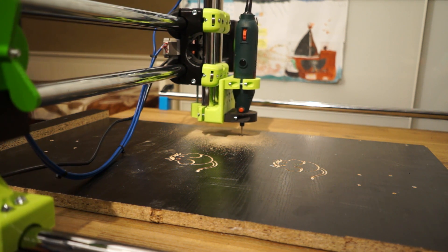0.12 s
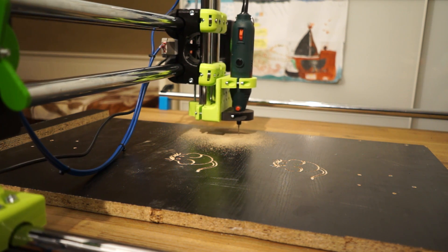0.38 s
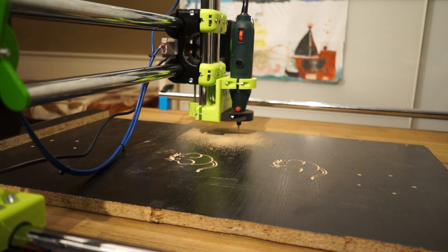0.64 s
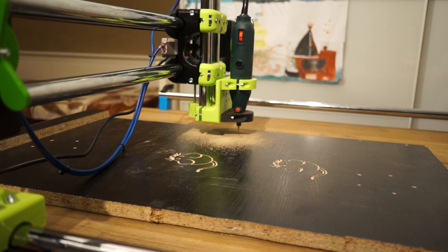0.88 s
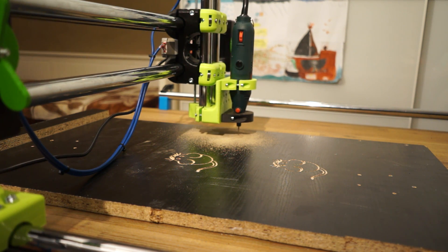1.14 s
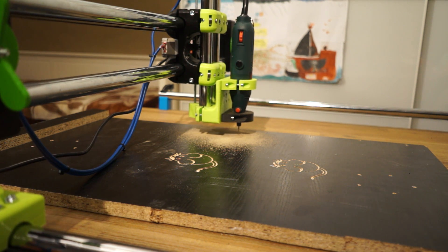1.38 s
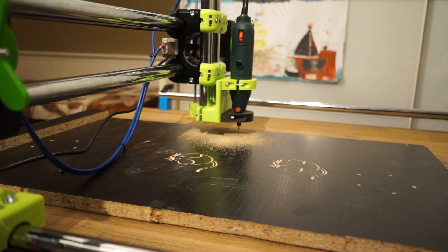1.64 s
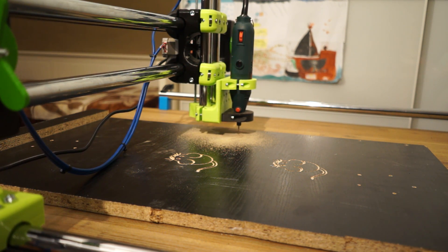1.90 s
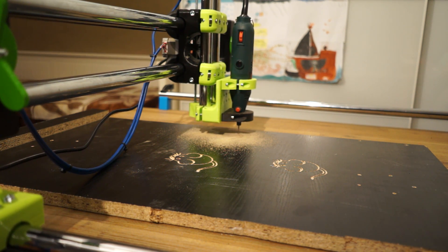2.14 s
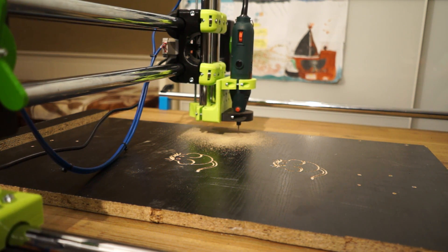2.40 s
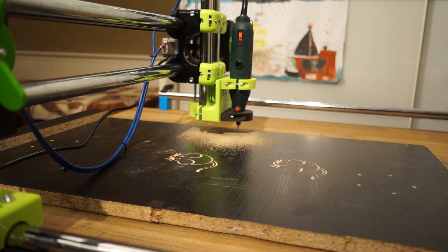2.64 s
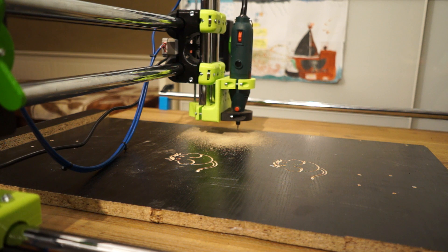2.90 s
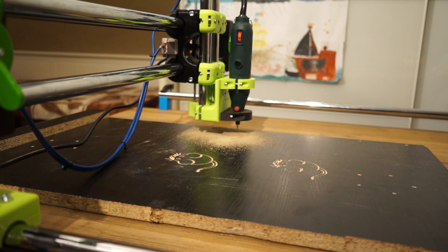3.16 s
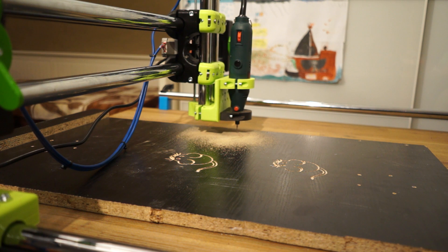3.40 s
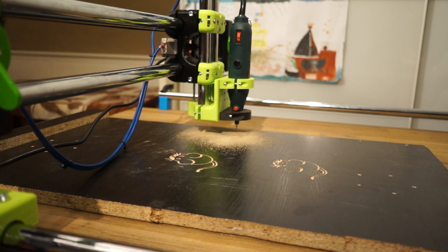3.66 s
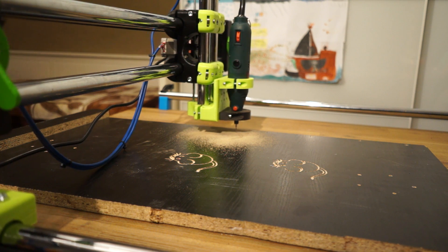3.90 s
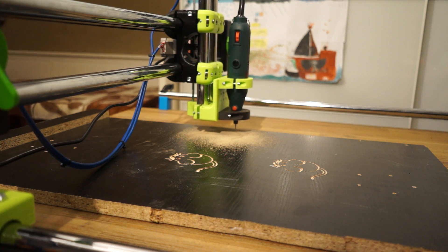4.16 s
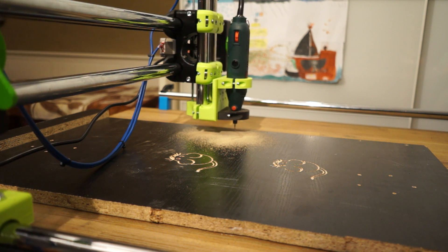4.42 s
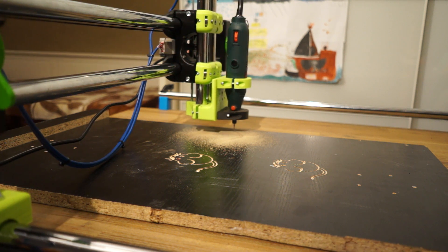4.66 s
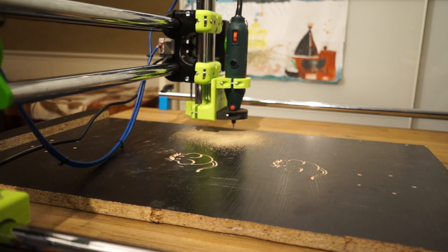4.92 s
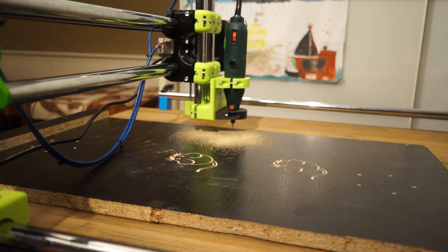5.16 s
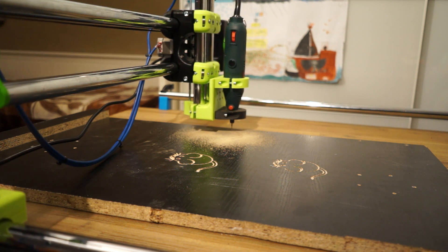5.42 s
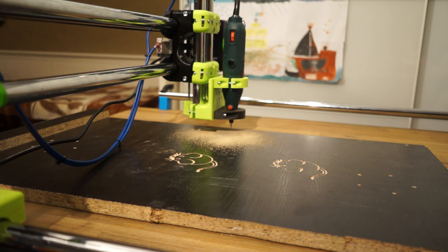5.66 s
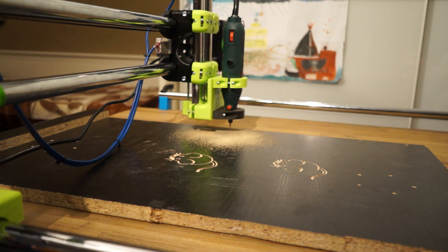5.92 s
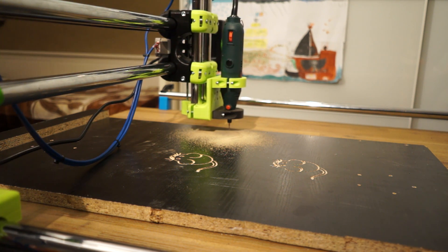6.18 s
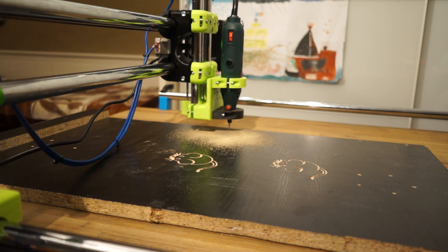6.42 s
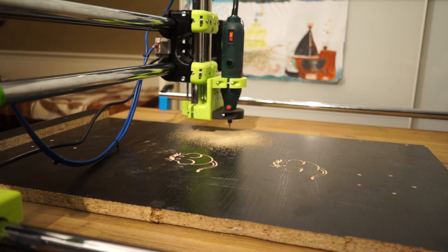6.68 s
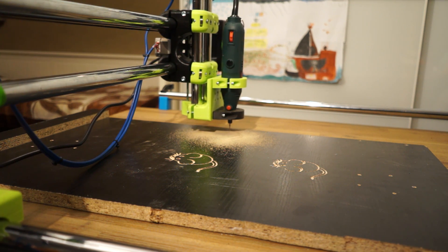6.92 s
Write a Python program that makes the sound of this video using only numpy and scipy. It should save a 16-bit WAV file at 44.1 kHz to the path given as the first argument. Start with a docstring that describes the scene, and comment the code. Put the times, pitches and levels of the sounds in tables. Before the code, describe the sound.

Steady piercing motor whine around 490 turns a second, free at first, then cutting board with brighter ringing, hiss and late rough chatter.

```python
"""Rotary tool cutting wood

A small high-speed rotary tool on a gantry spins free, plunges its bit into a wood board, cuts, and at last chatters.
The shaft sings in sine tones at multiples of its speed, with fainter bearing and chatter tones in between.
Fan, brush and chip hiss is noise that swells with the turning shaft and rings in the housing.
Stepper motors hum in low tones while an axis moves, and mains ripple makes the lowest tones pulse."""
import sys
import numpy as np
from scipy import signal
from scipy.fft import rfft, irfft, next_fast_len
from scipy.io import wavfile
from scipy.ndimage import uniform_filter1d, map_coordinates

SR = 44100
rng = np.random.default_rng(int(sys.argv[2]) if len(sys.argv) > 2 else 0)


def voltage_ratio(decibels):
    """Convert decibels (scalar or array-like) to amplitude ratios, 20 dB per decade."""
    exponent = np.asarray(decibels, float) / 20
    return 10 ** exponent


def dump_mix(stems):
    """Bounce the given channels to the path in sys.argv[1] as a 16-bit WAV at rate SR."""
    frames = np.atleast_2d(stems).T  # one column per channel
    limited = np.clip(frames, -1, 1)  # hard clip at full scale
    pcm = np.round(limited * 32767).astype(np.int16)
    wavfile.write(sys.argv[1], SR, pcm)


N = 310905

# how the cut goes on: (time [s], stage [0 free, 1 shallow, 2 medium, 3 deep, 4 chatter])
CUT_STAGE = [(0, 0), (.975, 0), (.995, 1), (2, 1), (3.7, 2), (5.4, 3), (6.27, 3), (6.32, 4), (7.05, 4)]


def unit(x):
    """Scales a signal to rms 1."""
    return x / np.sqrt(np.mean(np.abs(x) ** 2) + 1e-20)


def curves(rows):
    """Draws straight lines between the rows: one value per sample for each column after the time."""
    times, *columns = np.transpose(rows)
    return [np.interp(np.arange(N) / SR, times, column) for column in columns]


def wobble(rate):
    """A random curve of straight pieces that turns at most rate times a second."""
    knots = rng.standard_normal(int(N * rate / SR) + 4)
    return map_coordinates(knots, [np.arange(N) * rate / SR], order=1)


def filtered(x, response):
    """Multiplies the spectrum of x by a response, a function of the frequency in Hz."""
    size = next_fast_len(N + 8192)
    spectrum = rfft(x, size) * response(np.fft.rfftfreq(size, 1 / SR))
    return irfft(spectrum, size)[:N]


def tone(angle, db, flutter, rate):
    """A sine, of rms level db before it flutters at random in size and phase."""
    shake = 1 + flutter * (wobble(rate) + 1j * wobble(rate))
    return np.sqrt(2) * voltage_ratio(db) * np.real(shake * np.exp(1j * angle))


def shaft_angle():
    """Adds up the speed, which sags under load, to the angle the shaft has turned, in radians."""
    # shaft speed: (time [s], turns per second [Hz])
    speed = [(0.0, 494.0), (0.94, 495.3), (1.12, 493.3), (1.45, 490.1), (1.9, 488.9), (2.8, 489.2),
             (3.5, 490.9), (4.15, 490.6), (4.7, 490.2), (5.7, 489.9), (6.35, 490.3), (6.6, 488.2),
             (6.85, 486.0), (7.05, 485.3)]
    return 2 * np.pi * np.cumsum(curves(speed)[0]) / SR


def contact():
    """How firmly the bit touches the wood, 0-1: it lets go in part when it skips off."""
    # the bit skips off the wood: (start [s], length [s], share of contact lost [0-1])
    skips = [(5.938, .055, 0.55), (6.268, 0.044, 0.7)]
    t = np.arange(N) / SR
    lost = 0
    for start, length, share in skips:
        inside = np.minimum(t - start, start + length - t)
        lost = lost + share * np.clip(inside / 0.01, 0, 1)  # 0.01 s to let go and to grip
    return np.clip(1 - lost, 0, 1)


def multiple_db(k, stage_db):
    """Level of one multiple of the shaft speed: its level by stage plus its swells."""
    # single multiples swell or fade as the carriage travels: (multiple, middle [s], length [s], change [dB])
    swells = [(3, 0.96, 0.7, 4), (4, 1.02, .18, -12), (2, 1.123, 0.23, 9.5), (3, 1.16, .14, -7),
              (3, 1.31, 0.46, 7), (11, 1.5, 1.5, 8), (12, 1.67, 0.79, 4.5), (13, 1.86, 1.3, 1.5),
              (8, 1.95, 0.74, 6.5), (15, 1.86, .8, 3.5), (7, 2.27, 1, 4.5), (8, 3.55, .6, 6),
              (24, 3.9, .8, -10), (23, 4.5, 1.4, 6), (8, 6.1, 0.96, 3), (8, .05, .7, -7),
              (10, 2.33, 1, -10), (12, 2.9, 1.3, 4), (16, 2.95, 0.64, 9), (14, 3, 1, 9),
              (13, 3.44, 0.93, -7), (18, 3.47, .6, 9.5), (3, 4.65, 1.8, -5), (21, 4.75, 1.3, -3),
              (10, 4.82, 1, 5), (5, 6.4, .35, 12), (2, 6.65, 0.92, 7.5), (4, 7.05, 0.37, 12)]
    t = np.arange(N) / SR
    db = np.interp(curves(CUT_STAGE)[0], range(5), stage_db)
    for multiple, middle, length, change_db in swells:
        if round(multiple) == k:
            hump = np.cos(np.pi * np.clip((t - middle) / length, -0.5, 0.5)) ** 2
            db = db + change_db * hump
    return db


def whine(angle):
    """One strike a turn: the low multiples keep step, the high ones are scattered by the housing."""
    # multiples of the shaft speed, levels before swells and drift:
    # (multiple, free [dB], shallow [dB], medium [dB], deep [dB], chatter [dB])
    multiples = [(1, -28.5, -34.5, -32, -32, -30), (2, -39, -36, -31.5, -30.5, -33.5),
                 (3, -28, -34, -26, -30.5, -36), (4, -40.5, -35, -33.5, -33, -43),
                 (5, -46, -52.5, -52, -54, -49.5), (6, -49, -46.5, -41.5, -40, -43),
                 (7, -45.5, -46, -38.5, -42, -47), (8, -42, -45.5, -46.5, -38, -40.5),
                 (9, -42, -44.5, -37.5, -51.5, -44.5), (10, -44, -44, -43, -34, -41.5),
                 (11, -51.5, -45.5, -41, -43, -48), (12, -53, -33, -34, -31.5, -35.5),
                 (13, -42, -27, -26.5, -36.5, -33.5), (14, -38.5, -58, -39.5, -47, -42),
                 (15, -36.5, -36.5, -47, -42.5, -41), (16, -37, -42, -43.5, -39.5, -38),
                 (17, -39, -43.5, -55, -40.5, -40.5), (18, -33.5, -44.5, -40.5, -41, -52),
                 (19, -41, -48, -45, -42, -47), (20, -39.5, -46, -38.5, -40.5, -47.5),
                 (21, -31, -37, -35, -38, -38), (22, -47.5, -42, -39, -42, -46),
                 (23, -40, -45, -41, -42, -46), (24, -37.5, -39.5, -37, -39, -48),
                 (25, -45, -49, -45, -45, -44), (26, -54.5, -62, -57, -52, -55),
                 (27, -50, -59, -58, -57, -59)]
    stage, touch = curves(CUT_STAGE)[0], contact()
    levels = [(round(k), multiple_db(round(k), db)) for k, *db in multiples]
    first, second, third, fourth = (db for _, db in levels[:4])

    # the motor's torque ripples at twice the mains frequency
    ripple_hz = 100
    ripple = np.sin(2 * np.pi * ripple_hz * np.arange(N) / SR)
    out = (1 + 0.018 * ripple + 0.038 * wobble(14)) * tone(angle, first, flutter=0.048, rate=38)
    out += tone(2 * angle, second, flutter=0.1, rate=30)
    on_resonance = np.pi / 3  # the third multiple sits on a housing resonance and shifts against its neighbours
    out += (1 + 0.12 * ripple) * tone(3 * angle + on_resonance, third, flutter=0.073, rate=30)
    out += touch * tone(4 * angle, fourth, flutter=0.1, rate=30)

    unrest = np.interp(stage, range(5), [0.13, 0.2, 0.28, 0.35, 0.4])
    # the deeper the cut, the more the bit's ring (multiples 11 to 13) breaks up into short bursts
    burst_depth = np.interp(stage, range(5), [0, 0.12, 0.2, 0.3, 0.55])
    bursts = 1 + burst_depth * np.tanh(3 * wobble(45))
    for k, db in levels[4:]:
        drift_db = 2.5 if k > 13 else 0.84  # largest random drift
        db = db + drift_db * np.tanh(wobble(2.53))
        start_angle = rng.uniform(0, 2 * np.pi)
        line = tone(k * angle + start_angle, db, flutter=unrest if k > 10 else 0.15, rate=28)
        if k <= 10:
            line = line * touch
        elif k <= 13:
            line = line * bursts
        # the highest multiples come from the motor and go on when the bit skips
        out += line
    return out


def bearings(angle):
    """Fainter lines between the multiples, from uneven turns and bearing balls, and the chatter of the bit."""
    # every second turn differs (halves); balls pass the outer (2.578) and inner race (3.422): (multiples)
    between = (.5, 1.5, 2.5, 3.5, 4.5, 12.5, 1.578, 2.578, 3.422, 4.422, .594, .703, 2.703)
    # levels of those lines in the same order: (free [dB], shallow [dB], deep [dB], chatter [dB])
    between_db = [(-54, -62, -60.5, -56), (-51.5, -49.5, -52, -51), (-47, -50, -50, -51),
                  (-37.5, -40, -43.5, -46), (-50, -56, -56, -55), (-50, -42, -42, -45),
                  (-60, -60, -50, -52), (-40, -42.5, -41, -38), (-34.5, -47, -39.5, -37),
                  (-50, -56, -56, -57), (-69, -70, -70, -72), (-72, -70, -70, -65), (-46, -53, -53, -52)]
    # chatter strength: (time [s], level [dB])
    chatter = [(0, -64), (3, -76), (4, -53), (6.4, -54), (6.62, -49), (6.67, -37.5), (7.05, -34)]
    # the bit chatters at 1.6 times the speed and mixes with the turn: (multiple, level against the chatter [dB])
    chatter_mix = [(1.602, 0), (3.204, -3), (3.602, -4), (2.398, -12), (3.102, -9), (5.602, -5)]
    stage, chatter_db = curves(CUT_STAGE)[0], curves(chatter)[0]
    lines = [(k, np.interp(stage, [0, 1, 3, 4], db)) for k, db in zip(between, between_db)]
    lines += [(k, chatter_db + db) for k, db in chatter_mix]
    out = np.zeros(N)
    for k, db in lines:
        start_angle = rng.uniform(0, 2 * np.pi)
        out += tone(k * angle + start_angle, db, flutter=0.15, rate=20)
    return out


def patchy(depth_db):
    """White noise whose gain wanders in patches of time and frequency."""
    z = signal.stft(rng.standard_normal(N), nperseg=512)[2]
    field = uniform_filter1d(rng.standard_normal(z.shape), size=8, axis=0)
    field = uniform_filter1d(field, size=12, axis=1)
    return signal.istft(z * voltage_ratio(depth_db * unit(field)), nperseg=512)[1][:N]


def hiss(angle):
    """Fan, brush and chip noise that swells once a turn, every second turn more, ringing in the housing."""
    # colour of the hiss running free and cutting: (frequency [Hz], relative level per Hz [dB])
    free_hiss = [(25, -53), (120, -31.5), (300, -22), (700, -13), (1050, -6.5), (1900, -8), (2900, -9.5),
                 (4200, -7.5), (7200, -7), (8700, -8.5), (12200, -5), (14000, -19), (16200, -30),
                 (18000, -23)]
    cut_hiss = [(25, -49), (120, -36), (300, -27.5), (550, -18.5), (700, -18), (1050, -10), (2000, -12),
                (4000, -11.5), (7500, -6.5), (8700, -12), (12000, -8), (14000, -22.5), (16200, -37),
                (18000, -28)]
    # housing resonances in the hiss: (frequency [Hz], width [Hz], boost [dB])
    housing = [(1310, 146, 3.5), (1498, 150, 9), (1695, 195, 5), (4960, 350, 3), (6150, 1100, 8),
               (10500, 1100, 5)]
    # hiss level before the plunge burst: one value for each stage [dB]
    stage_db = (-24, -29, -26.5, -26.5, -24.5)
    # chips burst out when the bit enters, then settle
    plunge_s, plunge_db, settle_s = 0.97, 6, 0.27
    stage, since = curves(CUT_STAGE)[0], np.arange(N) / SR - plunge_s
    burst_db = plunge_db * (since > 0) * np.exp(-np.abs(since) / settle_s)
    level_db = np.interp(stage, range(5), stage_db) + burst_db
    swell = 1 + 0.17 * np.cos(angle) + 0.091 * np.cos(angle / 2)

    def layer(spectrum):
        """One coloured noise of rms 1."""
        f, db = np.transpose(spectrum)

        def colour(hz):
            """Smooth spectrum plus the housing's bumps."""
            bumps = sum(boost / (1 + (2 * (hz - centre) / width) ** 2) for centre, width, boost in housing)
            return voltage_ratio(np.interp(np.log(hz + 1), np.log(f + 1), db) + bumps)
        return unit(filtered(swell * patchy(depth_db=1.5), colour))

    # wood on the bit damps the free-running rattle
    load = np.interp(stage, range(5), [0.029, 1.0, 0.91, 0.85, 0.79])
    mix = np.sqrt(1 - load) * layer(free_hiss) + np.sqrt(load) * layer(cut_hiss)
    return voltage_ratio(level_db + 0.25 * wobble(12)) * mix


def steppers():
    """Low hums of the stepper motors that start and stop with each move of an axis."""
    # one hum a row: (start [s], end [s], frequency [Hz], level [dB])
    moves = [(.05, .5, 172, -60), (0.137, .225, 185, -49), (.31, .4, 180, -51), (1.3, 1.95, 143, -73),
             (1.854, 2.38, 180, -64.5), (2.452, 3.35, 188.5, -59), (2.45, 3.35, 178.7, -66),
             (3.3, 3.6, 142, -68), (4.4, 4.75, 182, -66), (4.7, 5.1, 191, -67), (6.3, 6.6, 184, -67)]
    t = np.arange(N) / SR
    out = np.zeros(N)
    for start, end, hz, db in moves:
        gate = np.clip(np.minimum(t - start, end - t) / 0.031, 0, 1)  # fades in and out over 0.031 s
        out += gate * tone(2 * np.pi * hz * t, db, flutter=0.15, rate=15)
    return out


def scene():
    """Adds all sources into one channel; all but the steppers follow the same turning shaft."""
    angle = shaft_angle()
    return (whine(angle) + bearings(angle) + hiss(angle) + steppers())[None]


def band_limit(x):
    """A steep low-pass at the top of the band."""
    return signal.sosfilt(signal.butter(12, 19280, fs=SR, output="sos"), x)


def record(dry):
    """Removes everything above the band limit."""
    top_hz = 18470
    mix = filtered(dry[0], lambda hz: hz < top_hz)[None]
    return band_limit(mix)


dry = scene()
out = record(dry)
dump_mix(out)
```